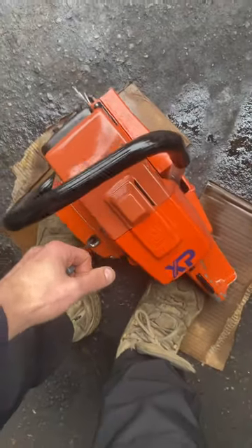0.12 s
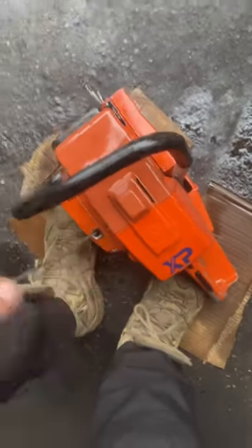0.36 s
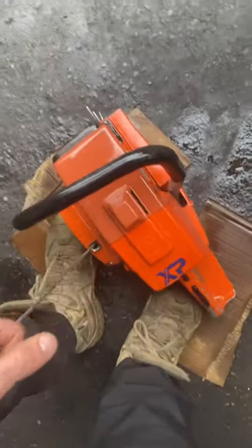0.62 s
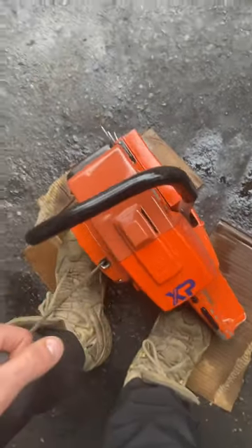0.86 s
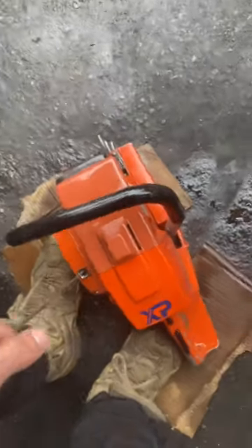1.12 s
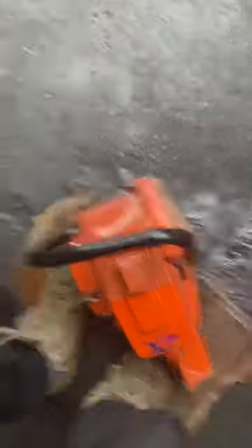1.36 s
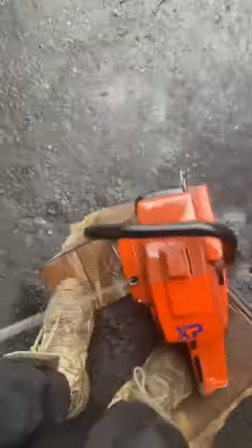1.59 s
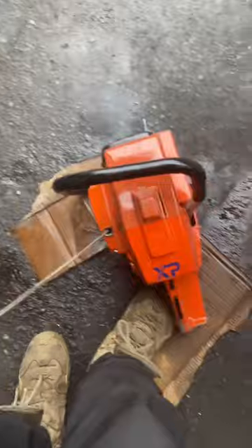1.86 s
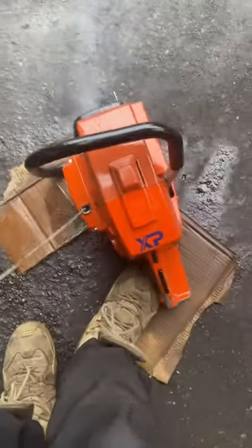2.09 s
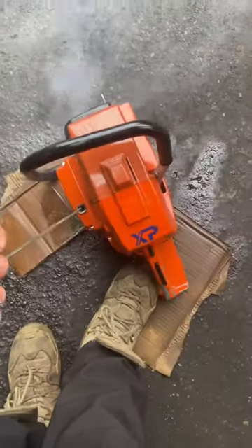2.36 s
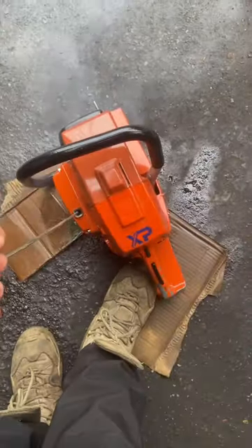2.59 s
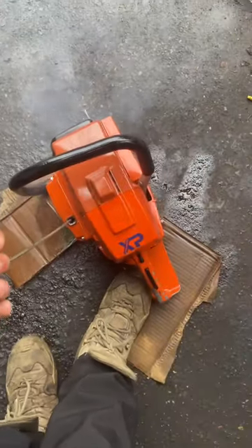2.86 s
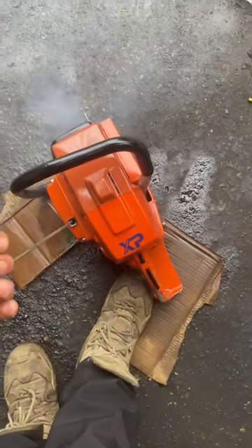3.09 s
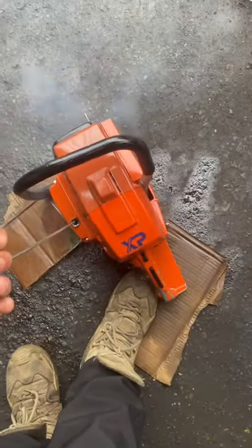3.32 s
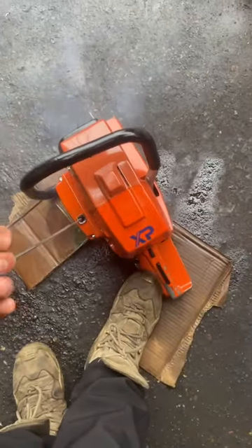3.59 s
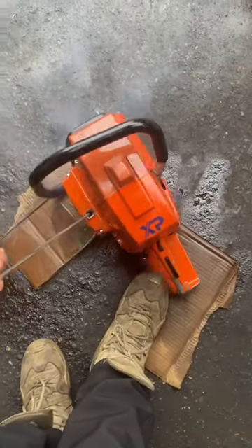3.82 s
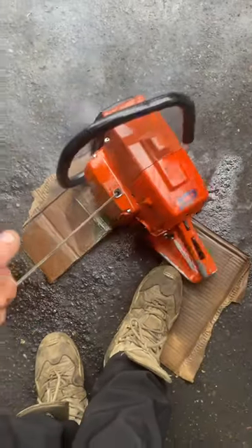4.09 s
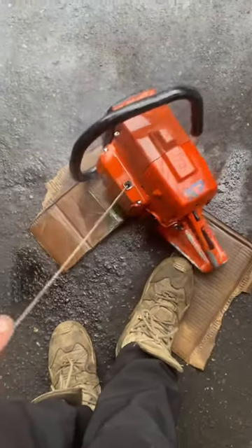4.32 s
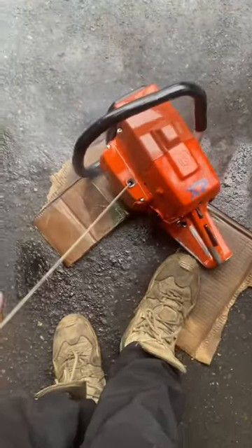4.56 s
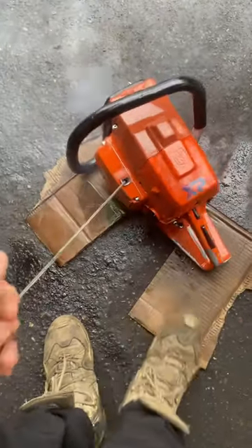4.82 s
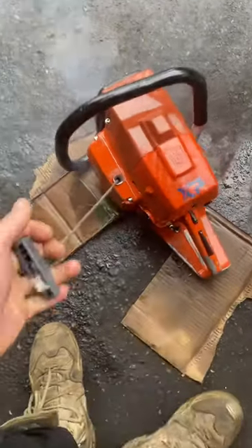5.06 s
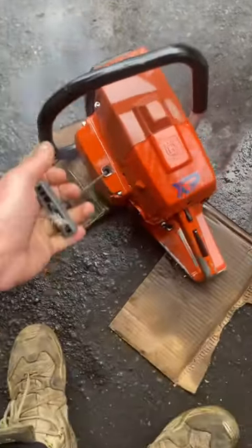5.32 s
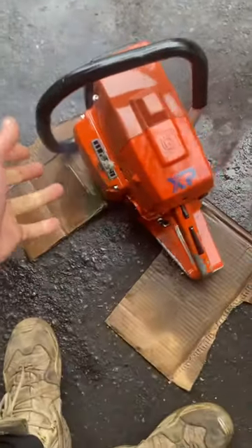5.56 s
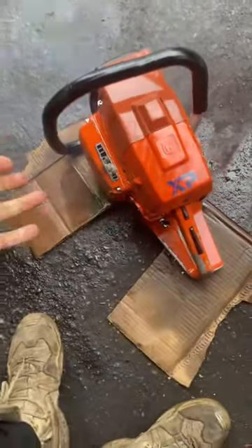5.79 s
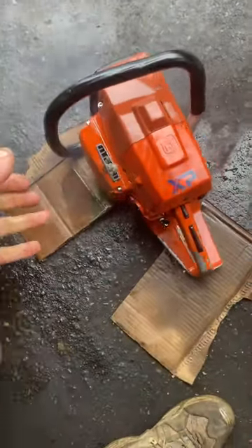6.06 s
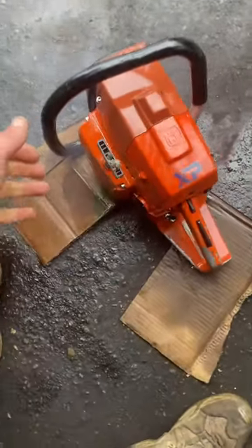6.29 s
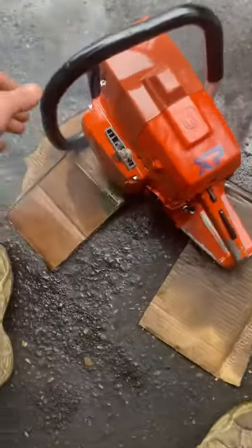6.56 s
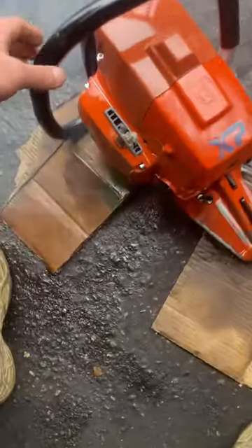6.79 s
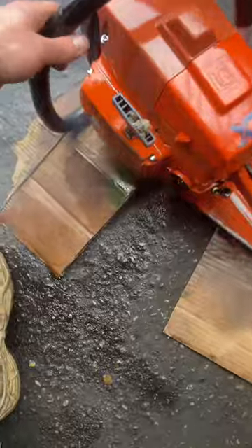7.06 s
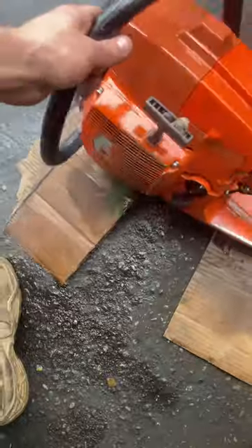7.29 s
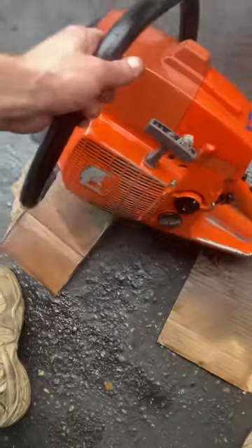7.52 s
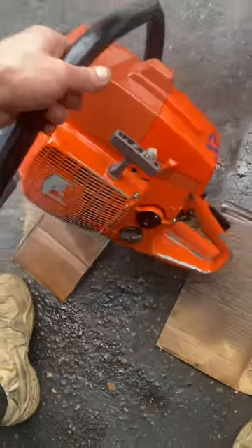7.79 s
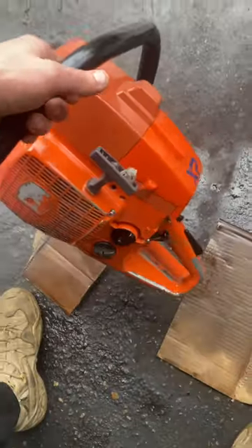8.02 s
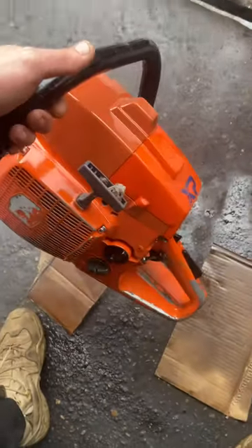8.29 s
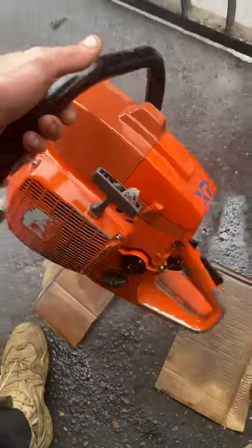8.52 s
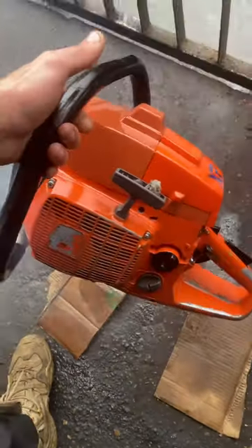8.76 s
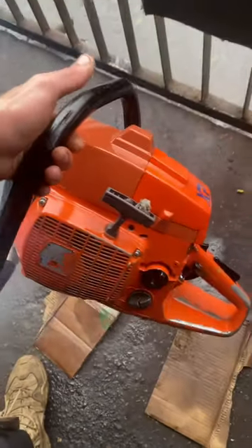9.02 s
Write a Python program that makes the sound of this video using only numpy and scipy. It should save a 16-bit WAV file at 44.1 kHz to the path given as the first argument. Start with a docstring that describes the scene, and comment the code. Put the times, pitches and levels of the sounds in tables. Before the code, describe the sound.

Outdoors on pavement, close stereo microphone, soft distant street wash. Around 0-0.2 s there are small dry ticks, then at 0.24 s a hard plastic knock with a low thud, brief cord rasp and fading clatter. Faint rustles, dull cardboard bumps and tiny taps follow until 1.2 s. At 1.3-1.4 s come sharp clacks and a quick rasping cord pull; the small two-stroke engine catches immediately with a bright crack. From then on it idles without stopping: about forty short sinking puffs a second, lumpy and uneven, kicked faster by firings every 0.15-0.3 s and coasting down between, with longer sags near 4.1, 6.7 and 8.6 s. Hissy metallic rattle and hollow muffler ring accompany it. A sharp click lands at 5.5 s and a softer knock at 6.8 s. From about 7.3 s, lifted and turned, it sounds brighter, raspier and less bassy, running to the end near 9.1 s.

```python
"""Small two-stroke chainsaw starting and idling

A saw lies on wet pavement: the starter handle knocks, the cord rasps and the engine catches.
At idle it fires only now and then; each firing kicks the crank up to speed and it coasts down, puffing
once a turn. Puffs are sinking tones with a bark that ring the muffler; noise and modes make the rattle.
Near the end the saw is lifted and turned, and sounds brighter. Far street noise is a coloured wash."""
import sys
import numpy as np
from scipy import signal
from scipy.fft import rfft, irfft, next_fast_len
from scipy.io import wavfile
from scipy.ndimage import uniform_filter1d

SR = 44100
rng = np.random.default_rng(int(sys.argv[2]) if len(sys.argv) > 2 else 0)


def pcm_store(signal):
    """Save signal as 16-bit PCM."""
    levels = np.round(np.clip(np.atleast_2d(signal), -1, 1) * 32767)
    wavfile.write(sys.argv[1], SR, levels.astype(np.int16).T)


def undo_db(level):
    """Turn decibels back into plain size, where 20 dB means ten times bigger."""
    steps = np.asarray(level, float) / 20
    return 10 ** steps


N = 403074
TIME_S = np.arange(N) / SR

# distant street noise: time_s, level_db
STREET_LEVEL = [(0.0, -46), (0.246, -43.5), (0.382, -40), (.6, -43), (.78, -44), (.86, -46.5), (.91, -44),
                (.96, -45), (1.02, -45), (1.09, -42), (1.14, -43.5), (1.3, -42.5)]
# its spectrum: freq_hz, density_db
STREET_COLOUR = [(18, -36), (30, 3), (64, 4), (193, 3), (329, 7), (585, 4.5), (699, 8), (798, 3),
                 (872, 4.5), (2950, 2.5), (6000, -9), (7800, -14), (10000, -14.5), (16000, -29)]
# brief holes heard in the 300-1500 Hz noise: time_s, change_db, spread_s
NOISE_HOLES = [(.91, -16, .02), (1.015, -10, .014), (1.088, -12, .012)]
# knocks on the housing: start_s, level_db, decay_s, band_hz, thud_db
KNOCKS = [(0.014, -24.5, 0.0014, 5000, -70), (0.063, -20.5, 0.00091, 4970, -80),
          (0.204, -19.5, 0.0079, 2820, -47), (0.237, -6, 0.0036, 1270, -12.5),
          (0.481, -37, 0.0038, 6000, -70), (0.51, -22.5, 0.0014, 540, -56), (.718, -48, .006, 700, -47),
          (.907, -36, 0.0013, 3500, -70), (1.065, -41, 0.0037, 2980, -70), (1.088, -33, 0.0015, 3000, -70),
          (1.287, -22, 0.0062, 4540, -59), (1.3076, -8.5, 0.0056, 2180, -45),
          (1.394, -15, 0.017, 2720, -39), (1.401, -11, 0.0026, 2400, -26), (5.48, -10, 0.0095, 3060, -30),
          (6.808, -21, 0.0029, 2000, -21)]
# housing modes: freq_hz, level_db, t60_s
HOUSING_MODES = [(970, -4, 0.061), (1480, 14, 0.0059), (2140, -3, 0.016), (2500, 9, 0.0068),
                 (3100, 10, 0.0024), (9260, -10, 0.096)]
# cord and recoil spring rasping: peak_s, peak_db, swell_db_per_s, fade_db_per_s
CORD_RASPS = [(0.205, -27, 8000, 300), (0.24, -20, 521, 291), (1.277, -35.5, 1200, 40),
              (1.313, -16.5, 1808, 1289), (1.34, -31, 548, 248), (1.41, -17, 1300, 4004)]
# hand and saw bump on the cardboard: start_s, level_db, end_hz
BUMPS = [(.3, -32, 110), (.345, -32, 95), (0.386, -34, 99), (.43, -44, 120), (.52, -48, 90),
         (.715, -38, 130), (.92, -41, 100), (1.02, -44, 110), (1.06, -39, 70)]
# firings: time_s, turns_to_next, strength_db
FIRINGS = [(1.354, 2, -28.5), (1.398, 11, -15.5), (1.67, 10, -19), (1.8923, 9, -24), (2.1165, 10, -19.5),
           (2.342, 6, -26), (2.511, 8, -23.5), (2.7584, 6, -28), (2.9176, 6, -23), (3.082, 7, -22),
           (3.26, 8, -23), (3.47, 7, -24), (3.665, 8, -24.5), (3.874, 16, -20), (4.286, 6, -23),
           (4.432, 7, -22), (4.609, 8, -31), (4.802, 9, -25.5), (5.019, 11, -22.5), (5.2719, 9, -23.5),
           (5.494, 10, -25), (5.7264, 9, -26), (5.955, 10, -23), (6.206, 9, -26.5), (6.426, 19, -21.5),
           (6.948, 8, -27), (7.162, 7, -29), (7.354, 12, -29), (7.656, 8, -23.5), (7.875, 10, -24),
           (8.096, 11, -23), (8.323, 19, -21), (8.7929, 8, -32), (8.9883, 7, -27), (9.158, 1, -50)]
# the crank falls behind briefly: time_s, behind_turns, spread_s
DRAGS = [(2.67, .16, .06), (6.8, .37, .09), (8.58, .1, .06)]
# how the saw stands to the listener: time_s, puff_db, rattle_db, muffler_side_share
STANCE = [(1.37, -19, -37, 0.04), (1.41, -15.5, -20, 0.15), (2.5, -14.5, -23, 0.07),
          (4, -15.5, -22.5, 0.09), (5.4, -15, -22.5, 0.15), (5.5, -17.5, -24.5, 0.22),
          (5.92, -18.5, -25, 0.17), (6.0, -15.5, -22, 0.06), (6.6, -16, -23, 0.15),
          (6.69, -11, -22.5, 0.22), (6.78, -14.5, -22.5, 0.14), (6.9, -13, -20.5, 0.01),
          (7.5, -13.5, -20.5, 0.38), (7.68, -14, -21, 0.51), (8.2, -13.5, -20, 0.68),
          (8.38, -13.5, -19, 0.62), (8.75, -13.5, -21.5, 0.46), (9.14, -13.5, -19.5, 0.43)]
# rattle spectrum: freq_hz, lying_db, turned_db
RATTLE_COLOUR = [(60, -11, -18), (230, -2, -8), (495, 0, 2), (910, -2, 7), (1300, 1.5, -3),
                 (2120, -1.5, -1), (2770, 1.5, 7), (3640, -8, -0.5), (5000, -5.5, -5.5), (5960, -7.5, -2),
                 (7440, -20.5, -35), (7950, -5.5, -9), (8940, -12, -3.5), (12550, -16, -14.5),
                 (15600, -21.5, -7), (16200, -52, -42)]
# casing and muffler modes in the rattle: freq_hz, level_db, t60_s
CASING_MODES = [(1109, -17, 0.17), (1696, -6, 0.045), (2262, -5, 0.043), (2810, -10, 0.076),
                (3110, -10, 0.055), (3712, -16.5, 0.067), (4211, -14, 0.072), (4530, -17, 0.051),
                (5233, -18.5, 0.058), (5524, -27, 0.08), (6150, -26, 0.059), (9400, -11, 0.033)]
# a loose plate sings along: start_s, end_s, freq_hz, level_db, t60_s
WHINES = [(1.68, 3.99, 10640, -50, .04), (2.132, 2.21, 4110, -31, .035), (4.36, 4.72, 6080, -26, .014),
          (7.393, 9.1, 3950, -46, .035)]
# single puffs changed in level, mostly weakened: time_s, change_db
CHANGED_PUFFS = [(2.669, 0.5), (4.112, -8), (4.199, 0), (6.675, -8), (6.703, -12), (6.759, -8),
                 (6.858, -3.5), (7.146, -7), (7.553, -6), (8.711, -4)]
# muffler modes rung by every puff: freq_hz, lying_db, turned_db, t60_s
MUFFLER_MODES = [(293.5, -7.5, -18.5, 0.066), (461.5, -12.5, -4.5, 0.051), (710, -19, -6.5, 0.058),
                 (896, -26, -6, 0.07)]
# two microphone ports: freq_hz, left_lead_rad, left_minus_right_db, reflected_re_direct_db
PORTS = [(0, 0, 0, -24), (300, -.3, -1, -20), (800, -1, -2, -7), (1200, -2, -6.5, 2), (1450, -4.4, -5.5, 2),
         (1800, -5.1, -2.5, -2), (2300, -4.6, -1, -4), (2900, -3.5, -4, -2), (3800, -5.2, -2, -1),
         (4500, -4.7, -3, 5), (4900, -6.3, -4, 0), (5300, -6, -1, -8), (6200, -4.6, 0, -10),
         (6600, -3.6, 0, -16), (6900, -3.2, 0, -28), (7500, -3.0, 0, -30), (8600, -1.9, 0, -7),
         (10500, 0, 0, -18), (12000, 1.6, 0, -6), (12700, 2.9, 0, -18), (13500, 3.14, 0, -26),
         (14200, 3.4, 0, -14), (15000, 4.6, 0, -4), (16500, 6.3, 0, -4)]

IDLE_TURNS_PER_S, REF_TURNS_PER_S = 40, 42
PITCH_WANDER_SHARE = .025   # casing and muffler modes slide in pitch
MODE_WANDER_DB = 1.8        # casing modes and whines waver randomly in level
TURNED_LAG_S = .00288       # at full turn the puff comes later


def rms_one(x):
    """Scale to rms 1."""
    return x / np.sqrt(np.mean(x ** 2) + 1e-20)


def in_time(rows, s=TIME_S):
    """Columns of a time curve at the times s; end values hold."""
    at, *columns = np.transpose(rows)
    return [np.interp(s, at, c) for c in columns]


def coloured(x, hz, db):
    """Filter x with a smooth spectrum, interpolated over log frequency."""
    size = next_fast_len(N)
    grid = np.log(np.arange(size // 2 + 1) * SR / size + 1)
    return irfft(rfft(x, size) * undo_db(np.interp(grid, np.log(hz), db)), size)[..., :N]


def ring(x, hz, t60_s):
    """Two-pole mode: a unit click starts a decaying sine of height about 1."""
    r, w = undo_db(-60 / (t60_s * SR)), 2 * np.pi * hz / SR
    return signal.lfilter([0, np.sin(w)], [1, -2 * r * np.cos(w), r * r], x + 1e-18)


def sliding_ring(x, hz, t60_s):
    """A decaying mode whose pitch follows the curve hz."""
    turn = np.exp(2j * np.pi * np.cumsum(hz) / SR)
    return (turn * signal.lfilter([1], [1, -undo_db(-60 / (t60_s * SR))], x / turn + 1e-18)).real


def glide(t, start_hz, end_hz, glide_s):
    """A sine whose pitch sinks exponentially from start to end."""
    return np.sin(2 * np.pi * (end_hz * t + (start_hz - end_hz) * glide_s * (1 - np.exp(-t / glide_s))))


def drift(rate_hz):
    """Slow random curve: straight lines between normal knots."""
    knots = rng.standard_normal(int(N / SR * 40) + 2)
    return np.interp(TIME_S * rate_hz, np.arange(len(knots)), knots)


def spread_noise():
    """Stereo noise: a shared direct part plus a reflected part of each side's own."""
    white = rng.standard_normal((3, N))
    hz, _, _, reflected_db = np.transpose(PORTS)
    total_db = 10 * np.log10(1 + undo_db(2 * reflected_db))
    direct = coloured(white[0], hz + 1, -total_db)
    return direct + coloured(white[1:], hz + 1, reflected_db - total_db)


def add(out, s, sounds):
    """Mix one short sound per row in at its time."""
    at = np.round(np.asarray(s) * SR).astype(int)[:, None] + np.arange(sounds.shape[1])
    np.add.at(out, at[at < N], sounds[at < N])


def street():
    """A soft wide wash of far noise, with low rustles from the hand and sleeve."""
    wash = undo_db(.57 * drift(4.6)) * rms_one(coloured(spread_noise(), *np.transpose(STREET_COLOUR)))
    middle = coloured(wash, [220, 320, 1400, 1800], [-40, 0, 0, -40])
    hole_db = sum(db * np.exp(-.5 * ((TIME_S - s) / spread_s) ** 2) for s, db, spread_s in NOISE_HOLES)
    rustle = rms_one(coloured(spread_noise(), [60, 150, 700, 1400], [-1, 2, -10, -16]))
    rustle = undo_db(-26 + 7 * drift(6.9)) * rustle
    return undo_db(in_time(STREET_LEVEL)[0]) * (wash - middle + undo_db(hole_db) * (middle + rustle))


def cord():
    """Cord and recoil spring rasp: wavering coloured noise under sharp swells."""
    catch_s = 1.42   # the pawls let go of the cord
    level = np.zeros(N)
    for s, db, swell, fade in CORD_RASPS:
        level += undo_db(db - np.maximum(swell * (s - TIME_S), fade * (TIME_S - s))) * (TIME_S < catch_s)
    rasp = coloured(spread_noise(), [100, 500, 2500, 5000, 10000, 16000], [2, 15, 13, -3, 2.5, -16])
    return level * undo_db(2.5 * drift(39.77)) * rms_one(rasp)


def bumps():
    """Bumps on the cardboard: short low tones sinking in pitch."""
    out, t = np.zeros(N), np.arange(2000) / SR
    for s, db, hz in BUMPS:
        envelope = np.minimum(t / .004, 1) * undo_db(-60 * t / .07)
        tone = glide(t, start_hz=1.4 * hz, end_hz=hz, glide_s=.01)
        add(out, [s], (undo_db(db) * envelope * tone)[None])
    return out


def clatter(noise):
    """The housing rattles on after the hard knock: fading low noise."""
    start_s, level_db, t60_s = .27, -33, .39
    level = undo_db(level_db - 60 * (TIME_S - start_s) / t60_s + 5 * drift(38)) * (TIME_S > start_s)
    return level * rms_one(coloured(noise, [60, 150, 300, 800, 1600], [-10, 1, 3, -8, -36]))


def starter():
    """Knocks are noise bursts that ring the housing and thud on the ground; the cord rasps."""
    out, t = np.zeros((2, N)), np.arange(2000) / SR
    thud, noise = np.zeros(N), spread_noise()
    for s, db, decay_s, hz, thud_db in KNOCKS:
        at = round(s * SR)
        burst = undo_db(db) * noise[:, at:at + len(t)] * np.minimum(t / .0012, 1) * np.exp(-t / decay_s)
        burst[:, :12] += 1.77 * undo_db(db) * np.hanning(12)   # first contact clicks
        band_hz = [hz / 1.2, min(hz * 2.46, 16000)]
        band = signal.butter(2, band_hz, "band", fs=SR, output="sos")
        out[:, at:at + len(t)] += 2 * signal.sosfilt(band, burst)
        thud[at + 260] = undo_db(thud_db)
    rings = sum(ring(out * undo_db(db - 28), hz, t60_s) for hz, db, t60_s in HOUSING_MODES)
    soft = uniform_filter1d(uniform_filter1d(thud, size=90), size=90)
    # the cardboard under the saw rings a moment later
    settle = undo_db(5.5) * ring(np.roll(soft, round(.045 * SR)), 270, .096)
    ground = ring(thud, 84, .18) + settle
    return out + rings + ground + cord() + bumps() + clatter(noise)


def last_firing():
    """Index of the latest firing at every sample."""
    s = np.transpose(FIRINGS)[0]
    return np.clip(np.searchsorted(s, TIME_S) - 1, 0, len(s) - 2)


def crank():
    """Crank angle_turns, turns_per_s and since_s: speed falls evenly from one firing to the next."""
    usual_coast_s, usual_loss, length_power, speed_power = .22, .22, .55, 1.2
    s, turns = np.transpose(FIRINGS)[:2]
    turns, k = np.round(turns), last_firing()
    span_s = s[k + 1] - s[k]
    mean = turns[k] / span_s
    # speed swing about the mean, as a share
    loss = usual_loss * (span_s / usual_coast_s) ** length_power * (IDLE_TURNS_PER_S / mean) ** speed_power
    u = np.maximum(TIME_S - s[k], 0) / span_s
    angle = np.cumsum(turns)[k] - turns[k] + turns[k] * (u + loss * u * (1 - u))
    for at_s, behind_turns, spread_s in DRAGS:
        angle = angle - behind_turns * np.exp(-.5 * ((TIME_S - at_s) / spread_s) ** 2)
    return angle, mean * (1 + loss * (1 - 2 * u)), u * span_s


def crank_orders(angle, speed):
    """The shaking piston sounds at the first three multiples of the turn, stronger with speed."""
    low = undo_db(-39) * np.sin(2 * np.pi * angle)
    low = low + undo_db(-30) * np.sin(4 * np.pi * angle + 4.98)
    low = low + undo_db(-34) * np.sin(6 * np.pi * angle + 3.8)
    return low * (speed / REF_TURNS_PER_S) ** 2.14 * np.clip(angle / 2, 0, 1)


def combustion():
    """Each firing gives a low push from the muffler that sinks in pitch."""
    push_s, lag_s = .006, .01
    ref_push_db, ref_firing_db, follow_share = -12, 5, .14
    s, _, firing_db = np.transpose(FIRINGS)
    t, out = np.arange(3000) / SR, np.zeros(N)
    push = (t / push_s) * np.exp(1 - t / push_s) * glide(t, start_hz=142.5, end_hz=57.7, glide_s=.0096)
    push_db = ref_push_db + follow_share * (firing_db - ref_firing_db)
    add(out, s + lag_s, undo_db(push_db)[:, None] * push)
    return out


def firing_crack(angle, since):
    """Crack level: each firing jumps and decays, then the exhaust port snaps open."""
    decay_s, snap_lag_s, snap_s, snap_db = .027, .009, .0015, 5
    strength = undo_db(np.transpose(FIRINGS)[2])[last_firing()]
    late = np.maximum(since - .006, 0) / decay_s
    crack = strength * np.minimum(late * 17, 1) * np.exp(-late) * (angle > 0)
    snap = np.exp(-(since - snap_lag_s) / snap_s) * (since > snap_lag_s)
    return crack + strength * undo_db(snap_db) * snap


def rattle_drive(angle, speed, since):
    """Grainy noise throbs with each turn, swells with speed and bursts at each firing."""
    level_db = in_time(STANCE)[1]
    throb = 1 + .19 * np.cos(2 * np.pi * (angle - .2)) + .04 * np.cos(4 * np.pi * (angle - .1))
    smooth_speed = uniform_filter1d(speed, size=500)
    running = undo_db(level_db + 1.73 * drift(25)) * (smooth_speed / REF_TURNS_PER_S) ** 1.02
    running = running * throb * (angle > 0)
    grains = undo_db(3.6 * np.minimum(rng.exponential(1, N), 5))   # loose parts tick unevenly
    drive = spread_noise() * grains / np.sqrt(np.mean(grains ** 2)) * running
    crack = spread_noise() * firing_crack(angle, since)
    # the crack is brighter than the hiss
    return drive + coloured(crack, [300, 1500, 5000, 12000], [-70, -7.5, 3.5, 9.5])


def casing_rings(drive, angle, since):
    """Piston slap, ticking loose parts and firings strike each casing mode with random strength."""
    ticks_per_s, slap_fade_per_turn, fresh_s, fresh_lag_s = 500, 3.5, .027, .009
    firing_swing_db, strike_swing_db, level_db = 4, 2.8, -23
    modes = len(CASING_MODES)
    slap = np.exp(-slap_fade_per_turn * ((angle + .093) % 1))
    strikes = np.clip(rng.standard_normal((int(angle[-1]) + 2, modes)), -2, 1.6)
    strikes = strikes[np.floor(angle + .1).astype(int)]
    ticks = (rng.random(N) < ticks_per_s / SR) * np.sqrt(SR / ticks_per_s)
    struck = np.clip(rng.standard_normal((len(FIRINGS), modes)), -2, 1.5)[last_firing()]
    fresh = np.exp(-since / fresh_s) * (since > fresh_lag_s)
    out = 0
    for k, (hz, db, t60_s) in enumerate(CASING_MODES):
        mode_db = level_db + db + firing_swing_db * struck[:, k] * fresh
        mode_db = mode_db + strike_swing_db * strikes[:, k] + MODE_WANDER_DB * drift(5)
        hits = drive * (slap * np.roll(ticks, 3001 * k) + fresh) * undo_db(mode_db)
        out = out + sliding_ring(hits, hz * (1 + PITCH_WANDER_SHARE * drift(1.5)), t60_s)
    return out


def whines(drive):
    """A loose plate sings: the rattle rings a narrow mode for a while."""
    out = 0
    for start_s, end_s, hz, db, t60_s in WHINES:
        gate = (TIME_S > start_s) * (TIME_S < end_s)
        out = out + ring(drive * undo_db(db + MODE_WANDER_DB * drift(33)) * gate, hz, t60_s)
    return out


def rattle(angle, speed, since):
    """Hiss coloured by stance, casing rings and whines share one noise drive."""
    drive = rattle_drive(angle, speed, since)
    hz, lying_db, turned_db = np.transpose(RATTLE_COLOUR)
    turned = np.clip(.61 * in_time(STANCE)[2], 0, 1)   # colour follows part of the turn
    hiss = coloured(drive * (1 - turned), hz, lying_db + 5) + coloured(drive * turned, hz, turned_db + 1.5)
    return hiss + casing_rings(drive, angle, since) + whines(drive)


def puff_gain(at, speed, since, level_db, chance):
    """Puff gain rises with speed; at low speed puffs scatter."""
    stumble_turns_per_s, stumble_db_per_turn_per_s = 36, .15
    slow = np.maximum(stumble_turns_per_s - speed[at], 0)
    change_db = stumble_db_per_turn_per_s * slow * np.clip(chance, -2, 1)
    change_db = change_db - 3 * (since[at] < .018)   # firing turn: half hidden in the push
    for s, db in CHANGED_PUFFS:
        change_db = change_db + db * (np.abs(at / SR + .005 - s) < .012)
    return undo_db(level_db + change_db) * (speed[at] / REF_TURNS_PER_S) ** .47


def muffler(clicks, angle, speed):
    """Puff clicks and the rush of gas after each puff ring the muffler modes."""
    roar_db = -31
    puff_db, _, side = in_time(STANCE)
    fade = np.exp(-2 * ((angle - .375) % 1))
    roar = undo_db(roar_db + puff_db) * 2 * fade * (speed / REF_TURNS_PER_S) ** .5
    blow = clicks + roar * rng.standard_normal(N) * (angle > 0)
    blow = uniform_filter1d(blow, size=16)   # soften
    out = 0
    for hz, lying_db, turned_db, t60_s in MUFFLER_MODES:
        mode_db = lying_db + side * (turned_db - lying_db) + 1.3 * drift(5.8)
        out = out + sliding_ring(blow * undo_db(mode_db), hz * (1 + PITCH_WANDER_SHARE * drift(4)), t60_s)
    return out


def puff_hum(at, gain, turned, chance, speed):
    """Each puff hums on from its crest at a multiple of the turn."""
    order, lag_s, level_db, turned_db, t60_s = 5, .0046, -11, -10, .11
    crests = np.zeros(N)
    crest_db = level_db + turned_db * turned + 1.5 * chance
    crests[np.minimum(at + round(lag_s * SR), N - 1)] = gain * undo_db(crest_db)
    return uniform_filter1d(sliding_ring(crests, order * speed, t60_s), size=40)


def puffs(angle, speed, since):
    """A port opens once a turn: a short high bark, a sinking puff, then half a turn later an intake gulp."""
    lead_s, leak_share, speed_pitch_power = .003, .17, .18   # the bark starts before the puff
    tail_db, bark_db, gulp_db, turned_body_db, turned_bark_db = -13, 2, -11, -10, -3
    at = np.flatnonzero(np.diff(np.floor(angle - .375)) > 0)
    level_db, _, turned = in_time(STANCE, at / SR)
    open_side = np.clip(leak_share + turned, 0, 1.3)
    chance = rng.standard_normal((len(at), 4))
    # puff time runs faster, so higher in pitch, with speed and turn
    t = (np.arange(1500) / SR - lead_s) * (1 + .013 * chance[:, 1:2] + .12 * turned[:, None])
    t = t * (speed[at, None] / IDLE_TURNS_PER_S) ** speed_pitch_power
    late = np.maximum(t, 0)
    swell = np.exp(-.5 * ((late - .0048) / .0038) ** 2) + undo_db(tail_db) * np.exp(-late / .011)
    body = np.minimum(late / .0015, 1) * swell * glide(late, start_hz=346, end_hz=130, glide_s=.006)
    peak = t - .00115
    bark = np.exp(-.5 * (peak / np.where(peak < 0, .0013, .0004)) ** 2)
    bark = undo_db(bark_db) * np.cos(2 * np.pi * 780 * peak) * bark
    uneven_puff, uneven_bark = undo_db(1.3 * chance[:, 0]), undo_db(2 * chance[:, 2])
    gain = puff_gain(at, speed, since, level_db, chance[:, 3]) * uneven_puff
    body_gain = undo_db(turned_body_db * turned)
    bark_gain = open_side * undo_db(turned_bark_db * turned) * uneven_bark
    out, clicks = np.zeros(N), np.zeros(N)
    sounds = gain[:, None] * (body_gain[:, None] * body + bark_gain[:, None] * bark)
    add(out, at / SR - lead_s + TURNED_LAG_S * turned, sounds)
    gulp = -np.sin(2 * np.pi * 260 * late) * np.exp(-.5 * ((late - .002) / .0018) ** 2)
    gulp = gulp * np.minimum(late / .001, 1)
    add(out, at / SR + .55 / speed[at] - lead_s + .0015, undo_db(gulp_db + level_db)[:, None] * gulp)
    lag = np.round(TURNED_LAG_S * turned * SR).astype(int)
    clicks[np.minimum(at + lag, N - 1)] = gain * uneven_bark
    return out + puff_hum(at, gain, turned, chance[:, 1], speed) + muffler(clicks, angle, speed)


def scene():
    """Street, starter and engine; the turned saw, off the ground, loses bass."""
    angle, speed, since = crank()
    lifted_db = -4 * np.clip(in_time(STANCE)[2], 0, 1)
    bass = undo_db(lifted_db) * (crank_orders(angle, speed) + combustion())
    engine = puffs(angle, speed, since) + bass + rattle(angle, speed, since)
    return street() + starter() + engine


def low_pass(x):
    """Removes everything above the highest recorded frequency."""
    return signal.sosfilt(signal.butter(12, 16840, fs=SR, output="sos"), x)


def record(dry):
    """Two microphone ports differ in level and phase by pitch; deep bass is cut, peaks rounded, top cut."""
    size = next_fast_len(N + 4096)
    grid = np.arange(size // 2 + 1) * SR / size
    hz, lead_rad, balance_db, _ = np.transpose(PORTS)
    turn = np.exp(.5j * np.interp(grid, hz, lead_rad)) * undo_db(.5 * np.interp(grid, hz, balance_db))
    ports = irfft(rfft(dry, size) * [turn, 1 / turn], size)[:, :N]
    ports = signal.sosfilt(signal.butter(4, 40, "high", fs=SR, output="sos"), ports)
    rounded = .9 * np.tanh(ports / .9)
    mix = signal.sosfilt(signal.cheby2(12, 60, 16300, fs=SR, output="sos"), rounded)
    return low_pass(mix)


dry = scene()
out = record(dry)
pcm_store(out)
```